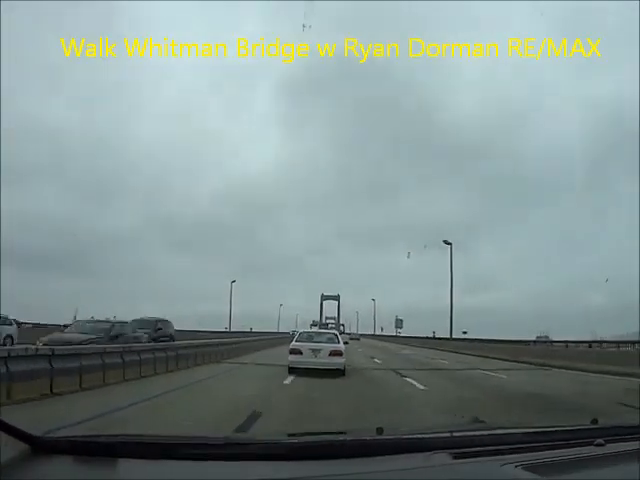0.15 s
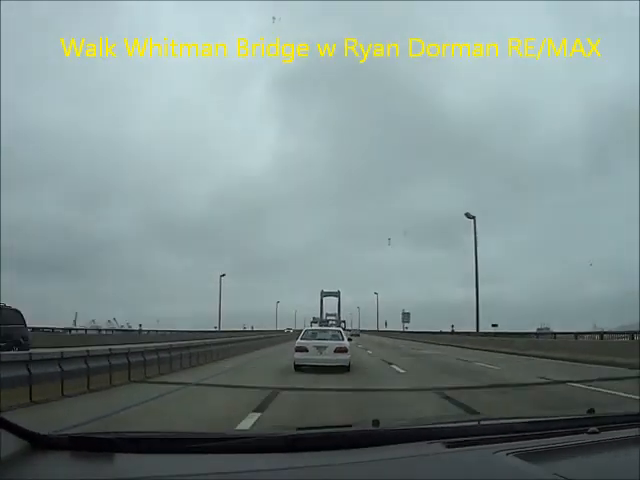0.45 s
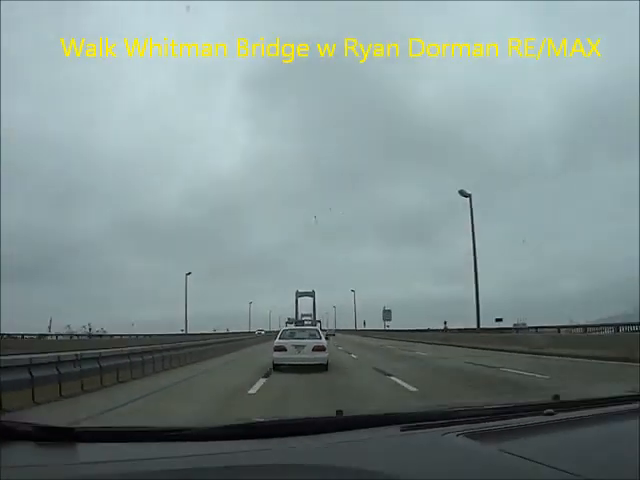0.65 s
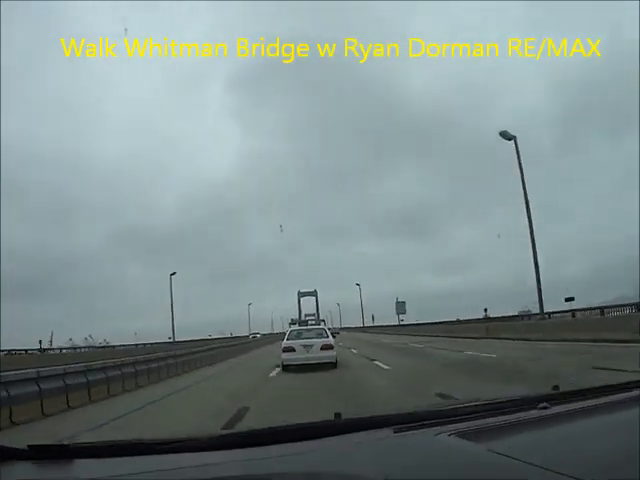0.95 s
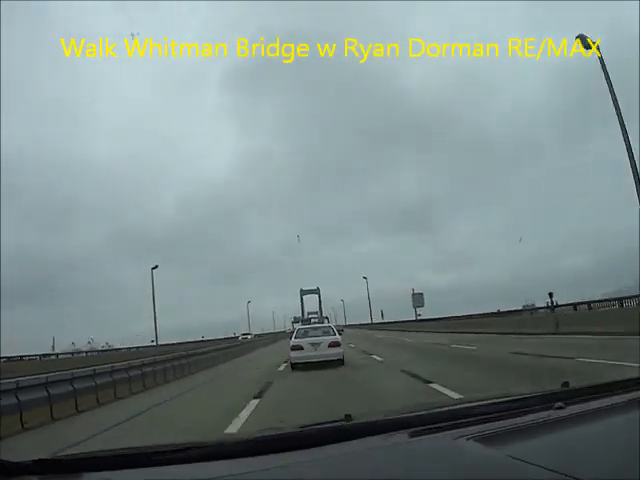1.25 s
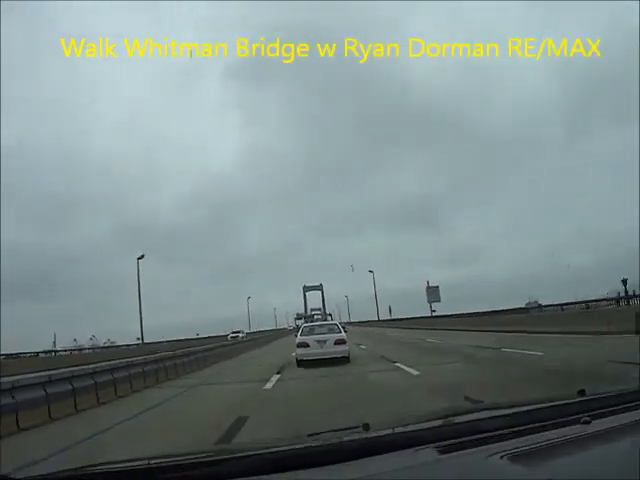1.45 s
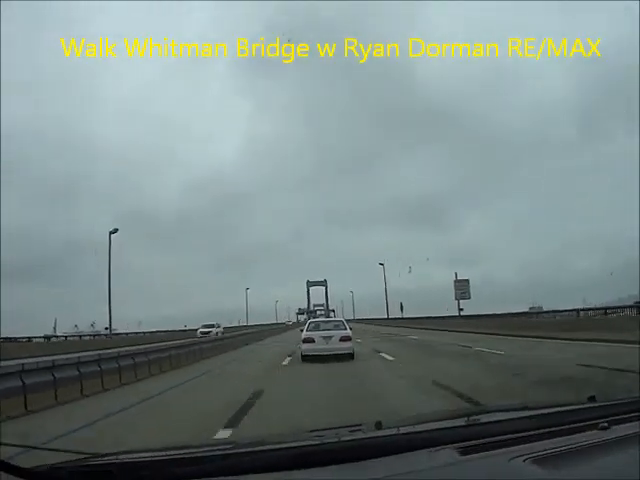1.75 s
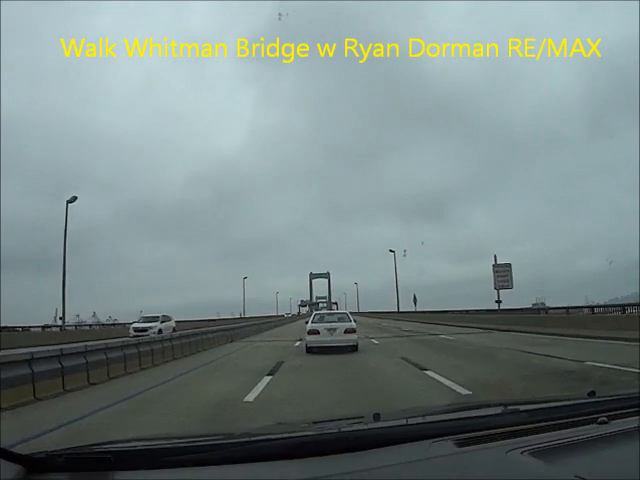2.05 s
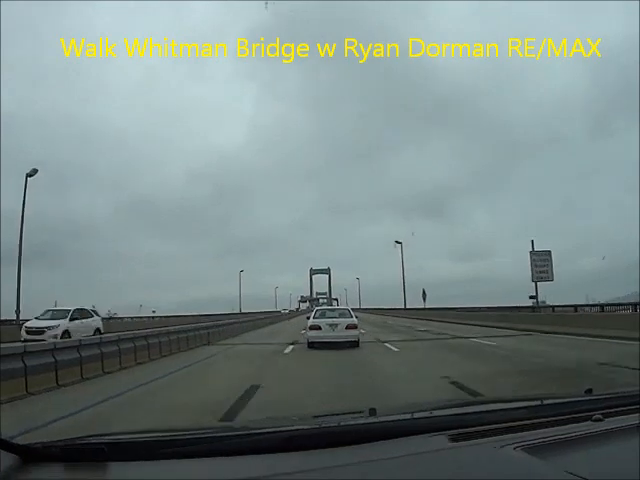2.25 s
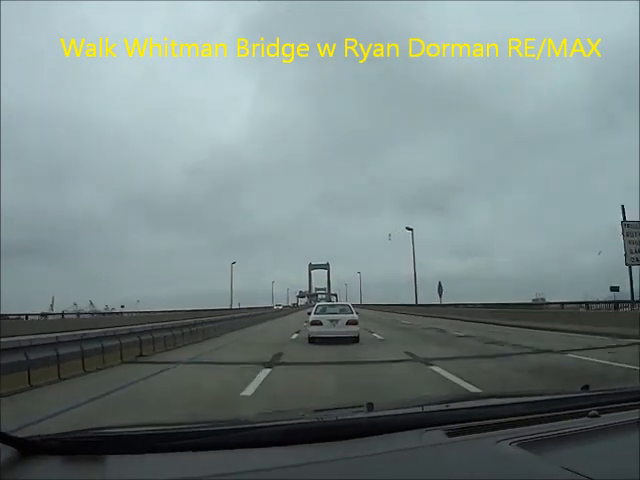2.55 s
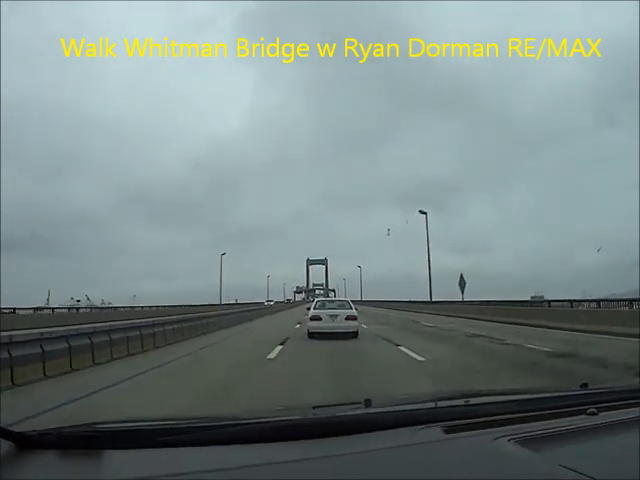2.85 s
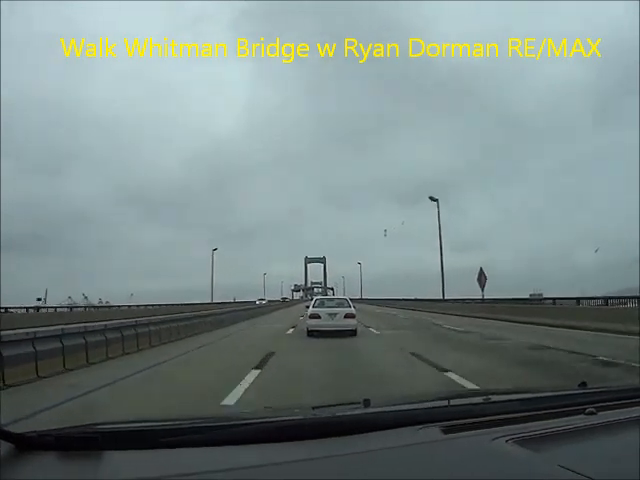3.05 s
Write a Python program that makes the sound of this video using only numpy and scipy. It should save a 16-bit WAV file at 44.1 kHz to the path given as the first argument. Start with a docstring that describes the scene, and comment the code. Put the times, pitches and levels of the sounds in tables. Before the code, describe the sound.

Constant boomy road rumble in a car cabin on a concrete highway, with muffled hiss on the glass. Wheels thud over joints in bursts, shaking loose trim and faintly jingling keys near a close stereo microphone.

```python
"""Car cabin on a concrete bridge

Tyre roar booms through cabin resonances over a wavering engine drone, with hiss on the glass.
Wheels thump over deck joints as decaying body modes, each followed by a shudder of low noise.
Trim snaps and chatters as short noise bursts, keys jingle as random decaying tones,
a tyre's air cavity rings once and a faint noise whistle comes and goes. Two close microphone ports listen.
"""
import sys
import numpy as np
from scipy import signal
from scipy.fft import rfft, irfft
from scipy.io import wavfile
from scipy.ndimage import uniform_filter1d

SR = 44100
rng = np.random.default_rng(int(sys.argv[2]) if len(sys.argv) > 2 else 0)


def amplitude_ratio(level_db):
    """Convert a level in decibels to the matching linear amplitude (field) ratio."""
    exponent = np.asarray(level_db, float) / 20
    return 10 ** exponent


def int16_out(signal):
    """Quantize to a 16-bit WAV file."""
    q = np.round(np.clip(np.atleast_2d(signal).T, -1, 1) * 32767)
    wavfile.write(sys.argv[1], SR, q.astype(np.int16))


N = 140679  # length in samples

# Road roughness under the tyres: start_s, shake_level_db, roar_level_db
ROAD_LEVELS = [(0.0, -24.5, -19.5), (0.26, -29, -21), (0.67, -26.5, -20.5), (0.7, -44, -21),
               (1.0, -18.5, -21), (1.06, -23, -20.5), (1.19, -32, -21), (1.31, -26, -21), (1.4, -49, -21),
               (1.73, -44.5, -20), (1.87, -25.5, -21), (2.01, -25.5, -19), (2.2, -22.5, -19),
               (2.35, -27, -19.5), (2.97, -33.5, -20.5), (3.02, -27, -20.5), (3.1, -24, -19.5),
               (3.14, -22, -21), (3.19, -29, -18)]
# Colour of the deep shake: pitch_hz, level_db (per Hz, relative)
SHAKE_COLOUR = [(12, -24), (25, -9), (35, -5), (52, 0), (75, -3), (105, -20), (200, -90)]
# Colour of the tyre roar ahead of the resonances: pitch_hz, level_db (per Hz, relative)
ROAR_COLOUR = [(14, -34), (35, -8), (60, -13), (97, -7.5), (147, -7.5), (190, -6.5), (258, -13.5),
               (400, -15), (591, -20.5), (838, -19.5), (1090, -24.5), (1190, -24.5), (1610, -33),
               (1920, -33), (2280, -38), (11000, -66.5), (14300, -93), (22000, -120)]
# Cabin and tyre resonances, rebalanced as the deck surface changes:
# pitch_hz, width_hz, lift_before_db, lift_after_db
CABIN_RESONANCES = [(120.6, 36, 6.5, 5.5), (186, 26, 0.5, 0.5), (254, 77, 8, 8), (295, 44, -5, -0.5),
                    (375, 16.3, 5.5, 4.5), (452, 61, 6.5, 5), (766, 66, 3.5, 6), (914, 91, 6.5, 2),
                    (1362, 330, 5, 5)]
# Wind and tyre hiss on the glass: start_s, level_db
HISS_LEVELS = [(0.0, -47), (0.74, -44.5), (1.75, -43), (2.06, -41.5), (2.98, -42), (3.19, -40.5)]
# Colour of that hiss: pitch_hz, level_db (per Hz, relative)
HISS_COLOUR = [(700, -36), (1300, -4.5), (2100, -10.5), (3100, -19), (4200, -30.5), (6000, -52),
               (11000, -60), (14000, -90)]
# Engine firing drone: start_s, pitch_hz, level_db
ENGINE_DRONE = [(0, 87.33, -35.5), (.15, 86.14, -23.5), (.3, 88.26, -27), (.62, 92.87, -22.5),
                (.85, 88.26, -24), (1.1, 89.7, -28), (1.3, 90.13, -43), (1.5, 93.16, -24.5),
                (1.7, 90.72, -22.5), (1.95, 91.57, -22.5), (2.2, 88.96, -23), (2.45, 86.54, -33),
                (2.65, 87.2, -22.5), (2.88, 84.8, -32), (3.05, 88.5, -21.5), (3.19, 87.4, -27)]
# Shakes of keys and trim: start_s, length_s, keys_level_db, chatter_level_db (both at the start)
SHAKES = [(0, 0.31, -60, -56.5), (0.873, 0.055, -58, -61), (1.037, 0.074, -71, -51.5),
          (1.246, .09, -68, -67), (1.992, 0.32, -57.5, -55), (3.005, 0.23, -64, -56.5)]
# Ringing tones of the keys: pitch_hz, level_db (relative), t60_s
KEY_TONES = [(5290, -1, .09), (6140, -5, .03), (7310, -9, .05), (8610, -4, .05), (9790, 0, .08),
             (10790, 0, .06)]
# Colour of the loose trim: pitch_hz, level_db (per Hz, relative)
TRIM_COLOUR = [(880, -19), (1500, 8.5), (1630, -3), (2620, -1.5), (3780, -10), (5970, -8), (7120, -14),
               (8620, -11.5), (9930, -13.5), (11000, -16), (14300, -37), (22000, -120)]
# Wheels over deck joints: start_s, blow_level_db, blow_centre_hz, shudder_level_db
JOINT_BLOWS = [(0.092, -13, 65, -29.5), (.49, -15, 131, -29), (0.883, -5.5, 166, -21),
               (0.959, -11, 110, -22.5), (0.993, -14, 90, -35), (1.008, -5, 85.6, -32),
               (1.021, -10.5, 70.4, -32), (1.108, -13, 220, -28), (1.689, -13.5, 85, -39),
               (1.938, -6.5, 160, -17.5), (1.973, -12.5, 85, -31), (2.005, -11, 121, -22),
               (2.092, -10, 54.7, -21), (2.104, -9, 205, -24), (2.122, -11, 85, -26), (2.168, -15, 74, -28),
               (2.199, -10, 206, -29), (2.381, -9.5, 205, -22), (2.514, -12.5, 134, -20),
               (3.002, -6, 128, -19), (3.118, -10, 136, -26), (3.128, -6.5, 43.6, -37)]
# Ringing modes of the car body: pitch_hz, level_db (relative), t60_s
BODY_MODES = [(39.5, 2.5, 0.14), (65, 0, 0.14), (98.7, 0, .1), (134.6, 5, 0.081), (210.3, 3, 0.076),
              (292, -3, 0.076), (396, -2, 0.067)]
# Colour of the shudder after a blow: pitch_hz, level_db (per Hz, relative)
SHUDDER_COLOUR = [(25, -20), (55, 6), (120, -5.5), (220, -1), (420, -12), (800, -40), (2000, -90)]
# Loose trim ticks: start_s, level_db (relative), tilt_db (per octave), left_minus_right_db
TRIM_TICKS = [(0.1351, -40, 0, -4), (0.895, -39.5, 9, 12), (0.939, -36, 3, -2), (0.9582, -26.5, 1, 4),
              (1.041, -40, 5, -8), (1.07, -23.5, 6, 5), (1.0774, -38, -7, -1.0), (1.0994, -43, -1, -7),
              (1.256, -47, -6, 10), (1.9806, -33.5, 1.5, 3), (2, -31, 2.5, 3), (2.0175, -46, 7, -3),
              (2.053, -33, 4, -6), (2.1094, -40, -3, -6), (2.1595, -47, -5, 2), (2.967, -31.5, 5.5, 5),
              (3.053, -35, -6, 4), (3.1175, -34, 6, 2), (3.157, -39, 7, 1), (3.176, -42, -6, 0)]
# The tyre's air cavity, ringing once: start_s, pitch_hz, level_db, rise_s, t60_s
CAVITY_RING = (1.926, 394, 1, .018, .09)
# Faint whistle in the hiss: start_s, level_db
WHISTLE_LEVELS = [(2.3, -75), (2.4, -58), (2.5, -53), (2.6, -52), (2.66, -48), (2.7, -58), (2.95, -56),
                  (3.1, -60), (3.19, -70)]
# Likeness of the two ports: pitch_hz, likeness (0 to 1)
PORT_LIKENESS = [(30, .98), (140, .98), (280, .94), (560, .87), (1100, .63), (2200, .42), (3500, .25),
                 (6400, .4), (11000, .4)]
# Level difference of the ports: pitch_hz, left_minus_right_db
PORT_LEAN = [(40, 6.9), (96, 6), (150, 4.3), (250, 2.8), (390, 1.3), (630, -.2), (1000, 0), (2570, .6),
             (4110, -.3), (10500, -.3)]
# Phase difference of the ports: pitch_hz, left_lead_radians
PORT_LEAD = [(25, -.3), (80, -.6), (160, -1.07), (330, -1.35), (700, -1.5), (1300, -1.3), (1900, -1.6),
             (3500, -.6), (5500, -.2), (10000, 0)]
# Colour of the microphone's own hiss: pitch_hz, level_db (per Hz, relative)
MIC_COLOUR = [(2000, -26), (4000, 1.5), (6500, 0.5), (11000, 0), (14000, -40)]


def evened(x):
    """Scale a sound to an rms of one."""
    return x / np.sqrt(np.mean(x ** 2) + 1e-20)


def read(points, hz):
    """Read a spectrum table along a logarithmic pitch axis."""
    f, value = np.transpose(points)
    return np.interp(np.log(hz + 1), np.log(f + 1), value)


def curve(table, column):
    """Draw one column of a timed table as straight lines over the scene."""
    rows = np.array(table)
    return np.interp(np.arange(N) / SR, rows[:, 0], rows[:, column])


def add(mix, start_s, sound):
    """Lay a sound into the mix, trimmed at the end of the scene."""
    part = mix[..., round(start_s * SR):][..., :sound.shape[-1]]
    part += sound[..., :part.shape[-1]]


def ports(x, other):
    """Close ports share the lows but hear partly unrelated highs, with level and phase offsets."""
    x, other = np.pad([x, other], ((0, 0), (4096, 4097)), "reflect")
    hz = np.fft.rfftfreq(len(x), 1 / SR)
    likeness = np.clip(read(PORT_LIKENESS, hz), 0, 1)
    left = rfft(x)
    right = likeness * left + np.sqrt(1 - likeness ** 2) * rfft(other)
    # Half of each difference goes to either side
    turn = amplitude_ratio(read(PORT_LEAN, hz) / 2) * np.exp(.5j * read(PORT_LEAD, hz))
    return irfft(np.array([left * turn, right / turn]), len(x))[:, 4096:4096 + N]


def noise(shape_db, patchy_db, size):
    """Two unrelated noises of one colour, sharing patches that drift over time and pitch."""
    frames = 4 * N // size + 5
    hz = np.fft.rfftfreq(size, 1 / SR)[:, None]
    t = np.arange(frames) * size / 4 / SR
    a, b, c, d, patches = rng.standard_normal((frames, len(hz), 5)).T
    patches = uniform_filter1d(patches, size=10, axis=0)
    patches = evened(uniform_filter1d(patches, size=8, axis=1))
    gain = amplitude_ratio(shape_db(hz, t) + patchy_db * patches)
    spectra = np.array([a + 1j * b, c + 1j * d]) * gain
    return evened(signal.istft(spectra, nperseg=size, noverlap=3 * size // 4)[1][:, :N])


def deep_shake():
    """Road roughness shakes the cabin as patchy low noise."""
    rumble = noise(lambda hz, t: read(SHAKE_COLOUR, hz), patchy_db=3.0, size=4096)
    return amplitude_ratio(curve(ROAD_LEVELS, column=1)) * rumble


def tyre_roar():
    """Tyre noise is lifted or dipped by resonances that rebalance on the new surface."""
    surface_s, blend_s = 1.45, 0.53

    def roar_db(hz, t):
        after = .5 + .5 * np.tanh((t - surface_s) / blend_s)
        total_db = read(ROAR_COLOUR, hz)
        for centre_hz, width_hz, before_db, after_db in CABIN_RESONANCES:
            lift_db = before_db + (after_db - before_db) * after
            total_db = total_db + lift_db / (1 + (2 * (hz - centre_hz) / width_hz) ** 2)
        return total_db

    return amplitude_ratio(curve(ROAD_LEVELS, column=2)) * noise(roar_db, patchy_db=1.4, size=4096)


def glass_hiss():
    """Wind and tyre hiss on the glass, as gently patchy noise."""
    hiss = noise(lambda hz, t: read(HISS_COLOUR, hz), patchy_db=2.0, size=1024)
    return amplitude_ratio(curve(HISS_LEVELS, column=1)) * hiss


def engine():
    """The firing order is one sine whose pitch drifts and wavers."""
    waver = uniform_filter1d(rng.standard_normal(N), size=2000)
    waver_hz = 1.666 * evened(uniform_filter1d(waver, size=2000))
    turns = np.cumsum(curve(ENGINE_DRONE, column=1) + waver_hz) / SR
    return amplitude_ratio(curve(ENGINE_DRONE, column=2)) * np.sqrt(2) * np.sin(2 * np.pi * turns)


def shaken(column):
    """Gain of the shaking over time, fading through each shake."""
    fade_db = -9  # by the end of a shake
    t, gain = np.arange(N) / SR, np.zeros(N)
    for row in SHAKES:
        start_s, length_s = row[:2]
        progress = np.clip((t - start_s) / length_s, 0, 1)
        during = (t >= start_s) * (t < start_s + length_s)
        gain += amplitude_ratio(row[column] + fade_db * progress ** 2) * during
    return gain


def keys():
    """Random clinks ring each key tone as a detuned pair leaning to opposite sides."""
    clinks_per_s, spread_db, detune = 170, 3, .004  # rate for each tone; detune as a ratio
    t, out, gain = np.arange(6000) / SR, np.zeros((2, N)), shaken(column=2)
    pair = ((1 - detune, [[1], [.7]]), (1 + detune, [[.7], [1]]))
    for hz, db, t60 in KEY_TONES:
        struck = rng.random(N) < clinks_per_s / SR
        hits = gain * struck * amplitude_ratio(spread_db * rng.standard_normal(N))
        for ratio, lean in pair:
            ring = amplitude_ratio(db - 60 * t / t60) * np.sin(2 * np.pi * hz * ratio * t)
            out += np.array(lean) * signal.oaconvolve(hits, ring)[:N]
    return out


def chatter():
    """Dense random trim taps, each a tiny decaying burst of trim-coloured noise."""
    taps_per_s, spread_db, t60 = 800, 2, 0.015
    struck = rng.random(N) < taps_per_s / SR
    taps = shaken(column=3) * struck * amplitude_ratio(spread_db * rng.exponential(1, N))
    decay = amplitude_ratio(-60 * np.arange(4000) / SR / t60)
    envelope = signal.oaconvolve(taps, decay)[:N]
    colour = amplitude_ratio(read(TRIM_COLOUR, np.fft.rfftfreq(N, 1 / SR)))
    common, left, right = evened(irfft(rfft(rng.standard_normal((3, N))) * colour, N))
    return envelope * (common + 0.98 * np.array([left, right]))


def bumps():
    """A wheel blow rings the decaying body modes, strongest near its centre pitch."""
    rise_s, fall_db = .003, -9  # fall per octave from the centre
    t, out = np.arange(0, .3, 1 / SR), np.zeros(N)
    for start_s, db, centre_hz, _ in JOINT_BLOWS:
        ring = np.zeros(len(t))
        for hz, mode_db, t60 in BODY_MODES:
            away_db = fall_db * abs(np.log2(hz / centre_hz))
            ring += amplitude_ratio(mode_db + away_db - 60 * t / t60) * np.sin(2 * np.pi * hz * t)
        add(out, start_s, amplitude_ratio(db) * (1 - np.exp(-t / rise_s)) * ring)
    return out


def shudder():
    """The body shudders on after each blow: low noise that swells and dies slowly."""
    rise_s, t60 = 0.019, .45
    t, power = np.arange(0, .6, 1 / SR), np.zeros(N)
    for start_s, _, _, db in JOINT_BLOWS:
        swell = amplitude_ratio(db - 60 * t / t60) * (1 - np.exp(-t / rise_s))
        add(power, start_s, swell ** 2)  # overlapping shudders add in power
    rumble = noise(lambda hz, t: read(SHUDDER_COLOUR, hz), patchy_db=5.0, size=2048)
    return np.sqrt(power) * rumble


def ticks():
    """Loose trim gives a short noise snap with a softer, wider buzzing tail."""
    rise_s, snap_t60, tail_t60 = .003, .022, 0.097
    trim_db, tail_db = -4, -12  # trim_db shifts every tick
    t, out = np.arange(4096) / SR, np.zeros((2, N))
    hz = np.fft.rfftfreq(len(t), 1 / SR)
    for start_s, db, tilt_db, pan_db in TRIM_TICKS:
        colour = amplitude_ratio(read(TRIM_COLOUR, hz) + tilt_db * np.log2((hz + 1) / 6000))
        raw = rng.standard_normal((3, len(t)))
        common, left, right = evened(irfft(rfft(raw) * colour, len(t)))
        snap = common * amplitude_ratio(-60 * t / snap_t60)
        tail = np.array([left + common, right + common]) * amplitude_ratio(tail_db - 60 * t / tail_t60)
        gain = amplitude_ratio(db + trim_db + np.array([[pan_db], [-pan_db]]) / 2)
        add(out, start_s, gain * np.minimum(t / rise_s, 1) * (snap + tail))
    return out


def tyre_ring():
    """The tyre's air cavity gives a hollow sine note that swells quickly and dies."""
    start_s, hz, db, rise_s, t60 = CAVITY_RING
    t, out = np.arange(0, .3, 1 / SR), np.zeros(N)
    envelope = amplitude_ratio(db - 60 * t / t60) * (1 - np.exp(-(t / rise_s) ** 2))
    add(out, start_s, envelope * np.sin(2 * np.pi * hz * t))
    return out


def whistle():
    """A narrow band of noise on one pitch that comes and goes."""
    centre_hz, width_hz = 2500, 40  # 6 dB down at the edges of the width

    def band_db(hz, t):
        return -20 * np.log10(1 + (2 * (hz - centre_hz) / width_hz) ** 2)

    return amplitude_ratio(curve(WHISTLE_LEVELS, column=1)) * noise(band_db, patchy_db=1., size=4096)


def microphone_hiss():
    """Each port adds its own faint hiss, partly shared between the two."""
    level_db = -61
    own, other = amplitude_ratio(level_db) * noise(lambda hz, t: read(MIC_COLOUR, hz), patchy_db=1., size=512)
    return np.array([own, 0.51 * own + 0.96 * other])


def scene():
    """Mix the noise beds and low tones through the ports, then add trim and keys."""
    beds = deep_shake() + tyre_roar() + glass_hiss() + shudder() + whistle()
    low = engine() + bumps() + tyre_ring()
    return ports(*beds) + ports(low, np.zeros(N)) + ticks() + keys() + chatter()


def top_cut(x):
    """Nothing passes above the cut-off."""
    return signal.sosfilt(signal.butter(12, 11120, fs=SR, output="sos"), x)


def record(dry):
    """Add the microphone's own hiss, then limit the band at both ends."""
    edge_hz, low_hz = 11080, 18
    padded = np.pad(dry + microphone_hiss(), ((0, 0), (255, 255)), "reflect")
    lowpass = signal.firwin(511, edge_hz, window=("kaiser", 9), fs=SR)
    dulled = signal.oaconvolve(padded, lowpass[None], "valid", axes=1)
    highpass = signal.butter(1, low_hz, "high", fs=SR, output="sos")
    finished = signal.sosfilt(highpass, dulled)
    return top_cut(finished)


dry = scene()
out = record(dry)
int16_out(out)
```